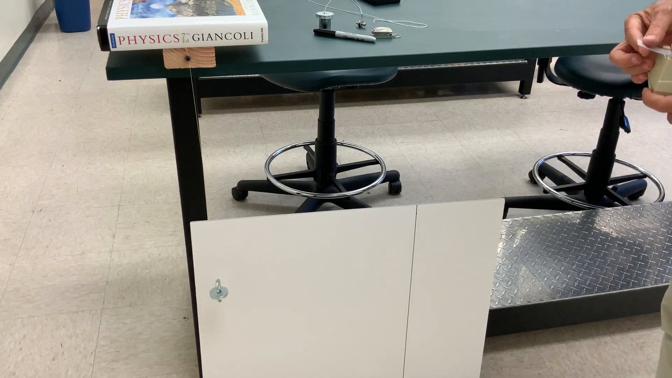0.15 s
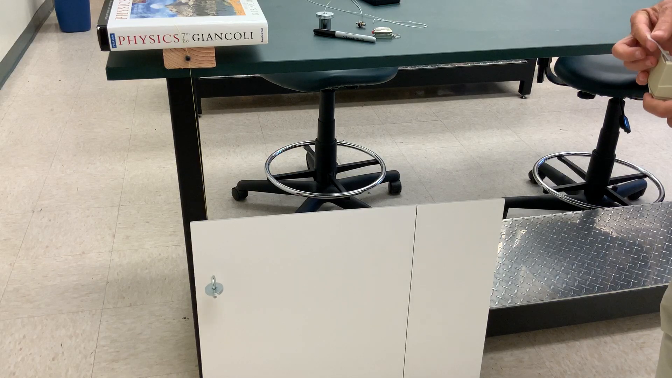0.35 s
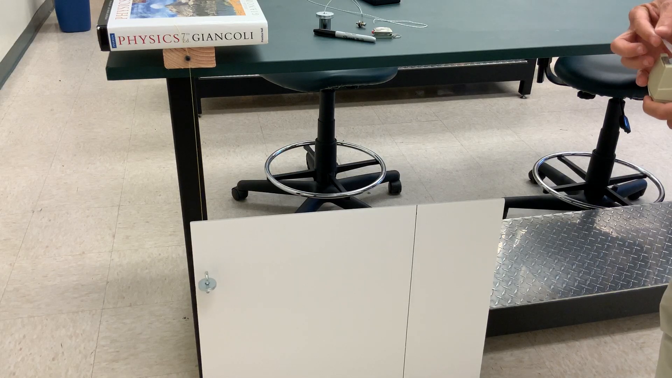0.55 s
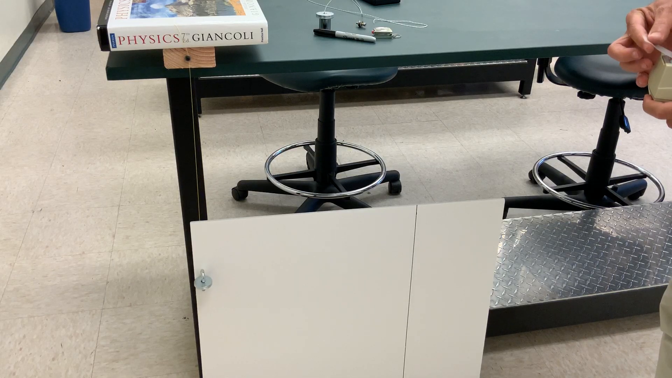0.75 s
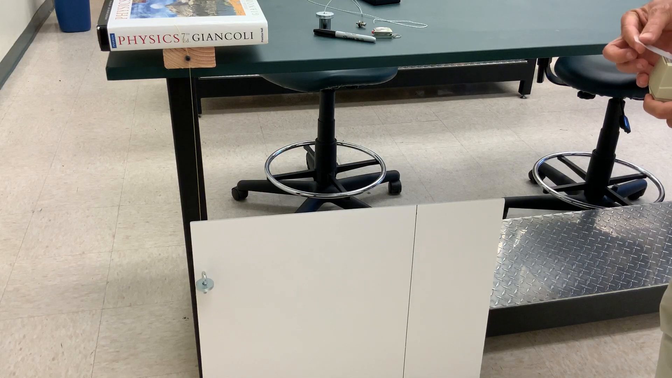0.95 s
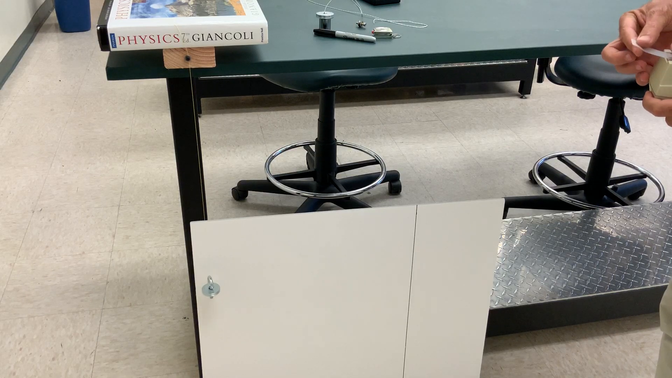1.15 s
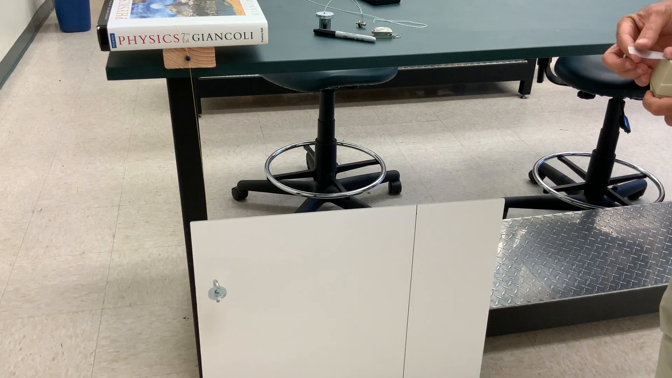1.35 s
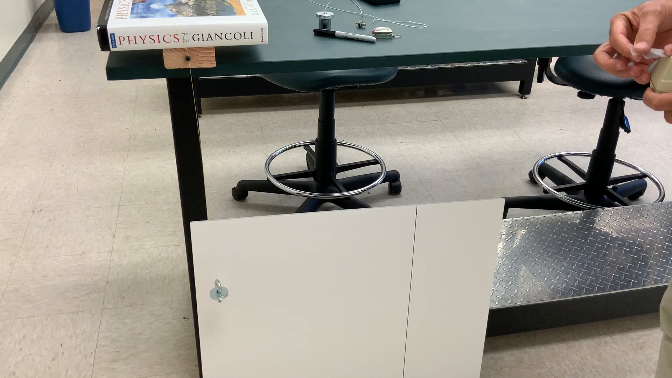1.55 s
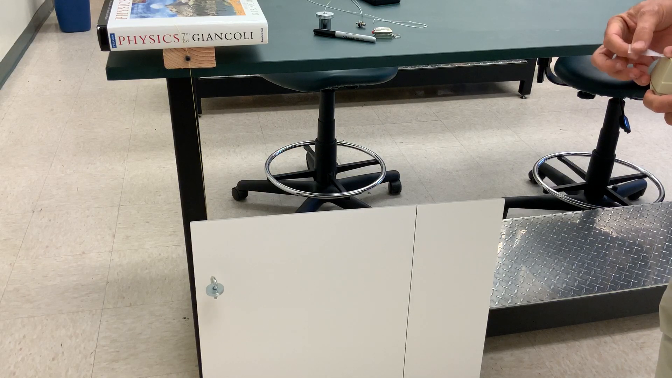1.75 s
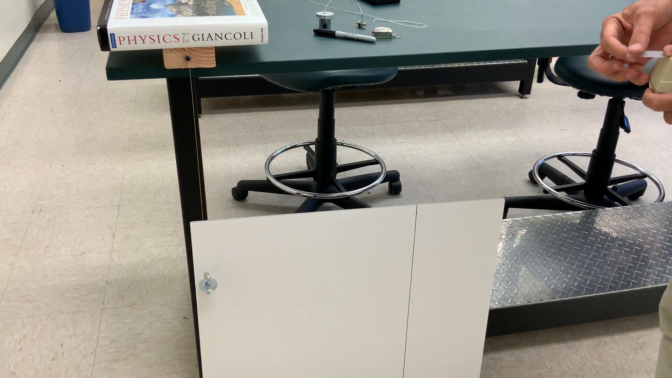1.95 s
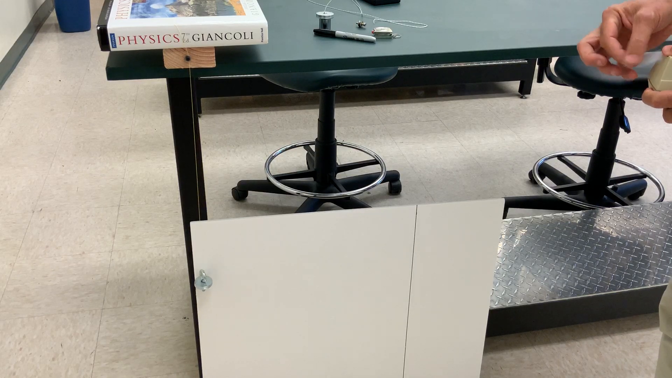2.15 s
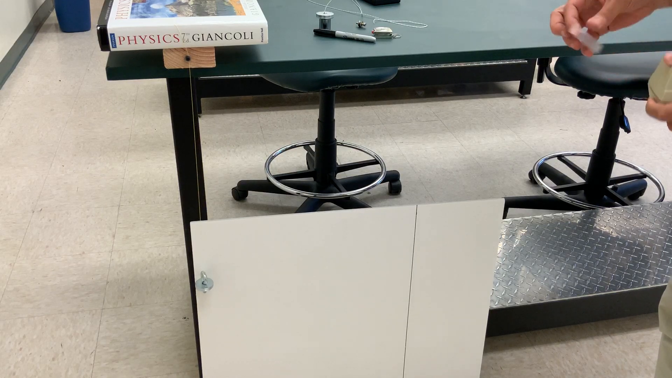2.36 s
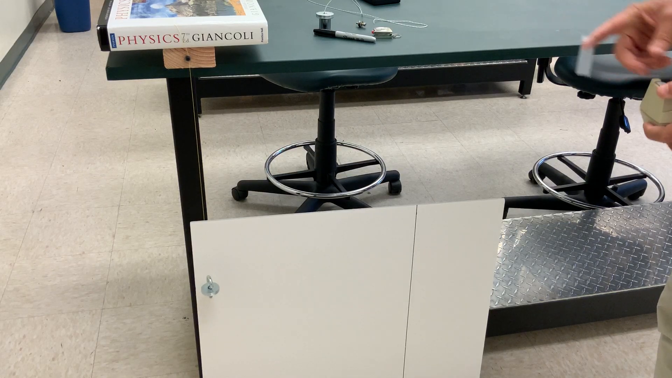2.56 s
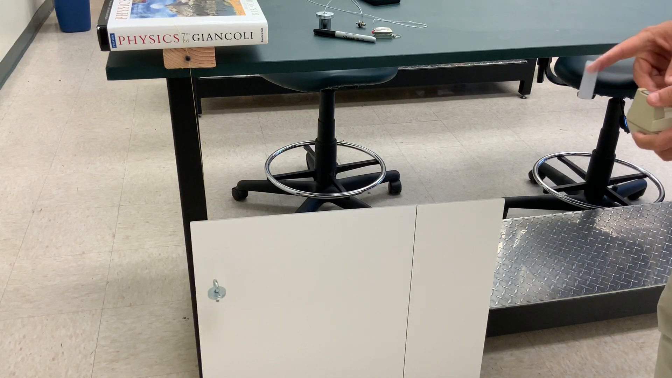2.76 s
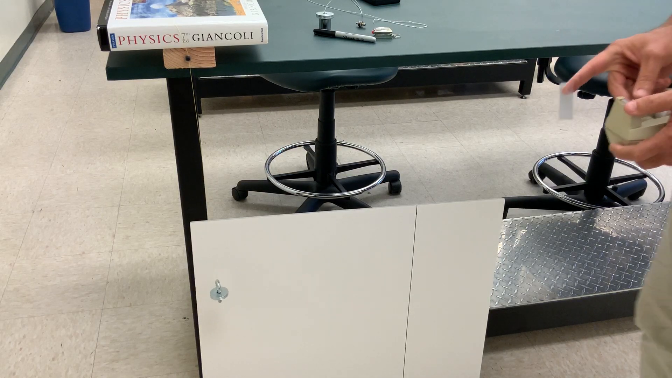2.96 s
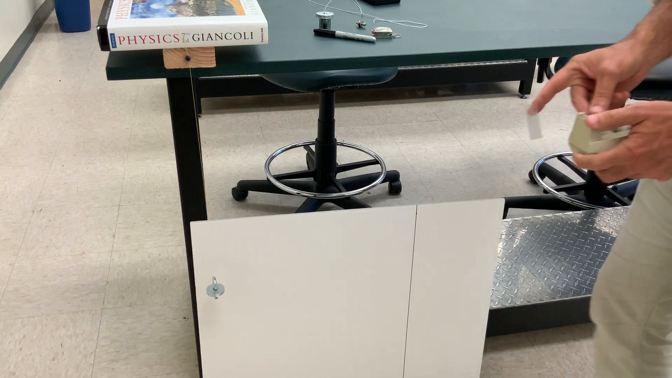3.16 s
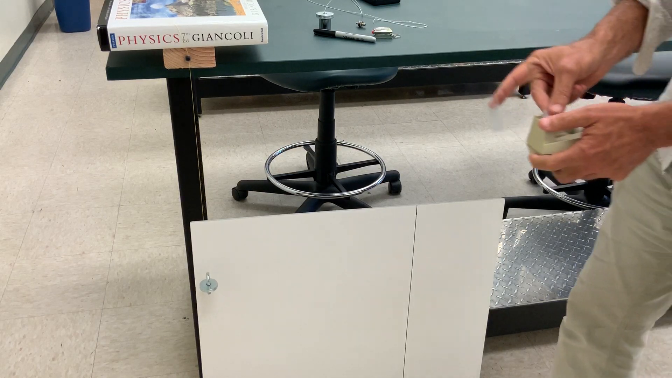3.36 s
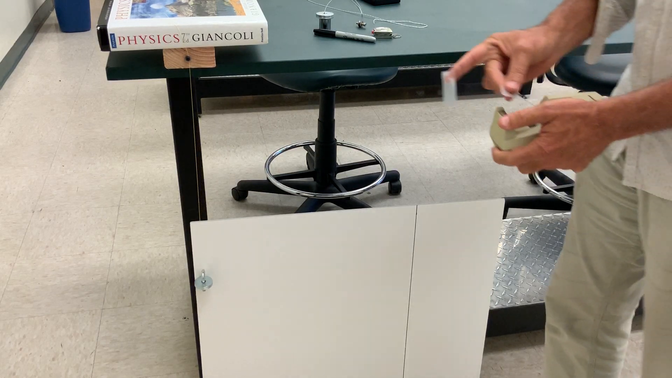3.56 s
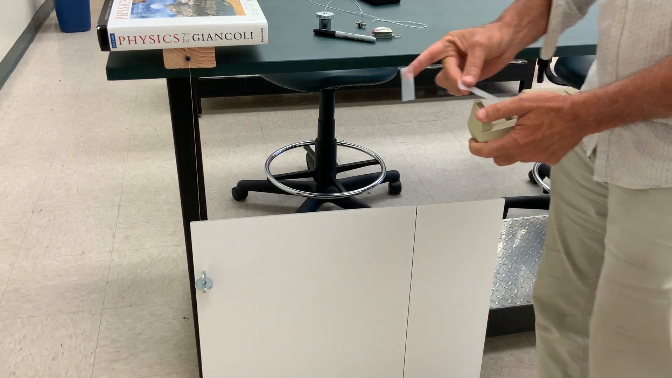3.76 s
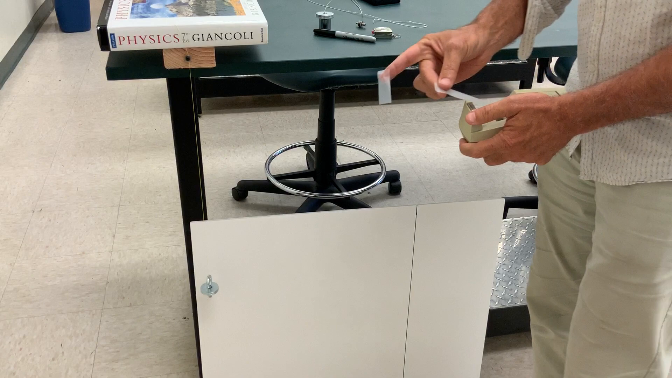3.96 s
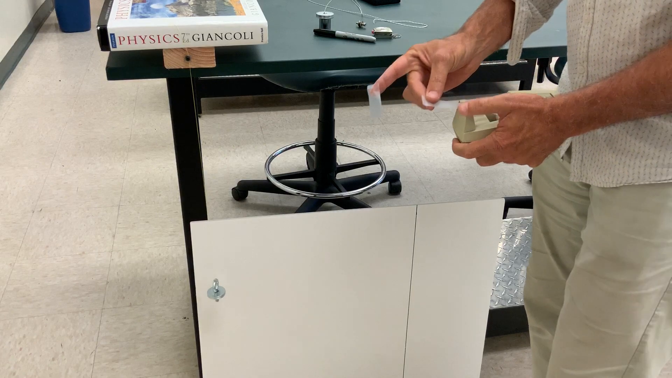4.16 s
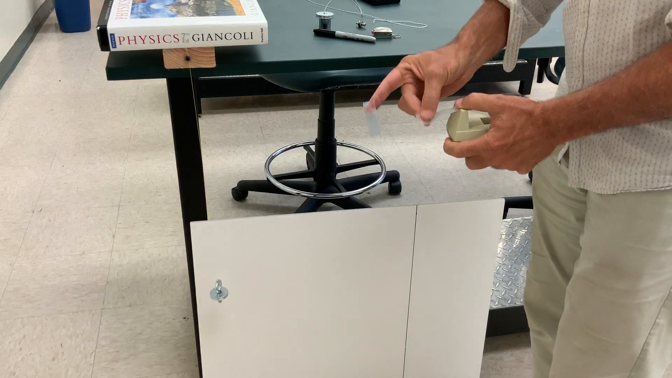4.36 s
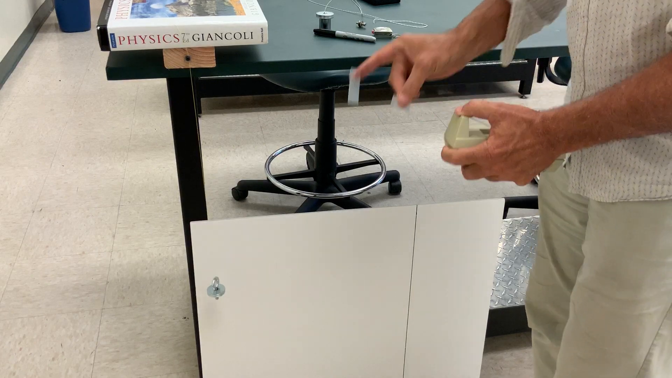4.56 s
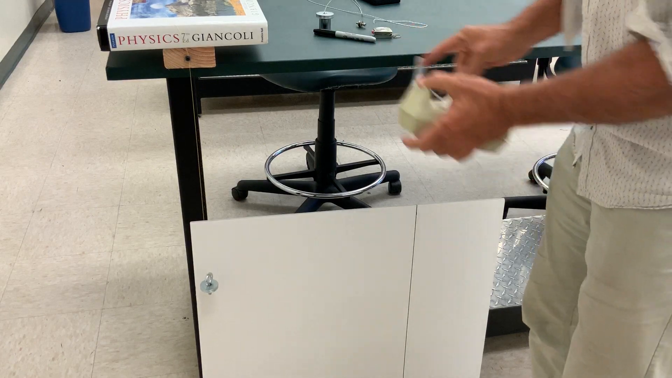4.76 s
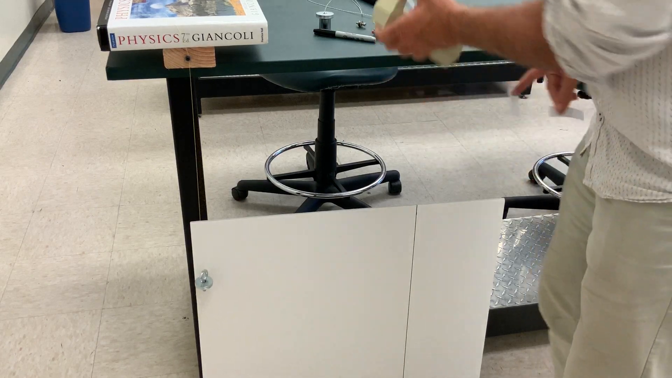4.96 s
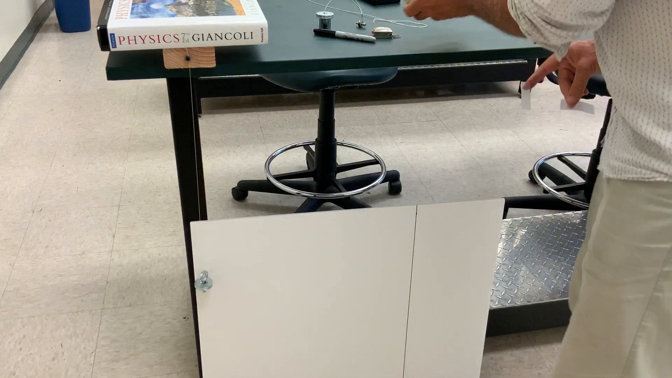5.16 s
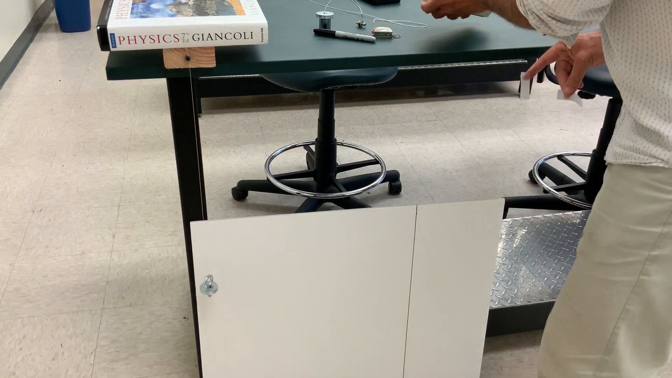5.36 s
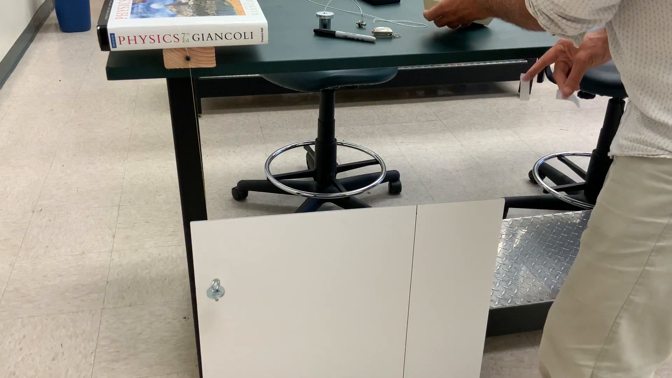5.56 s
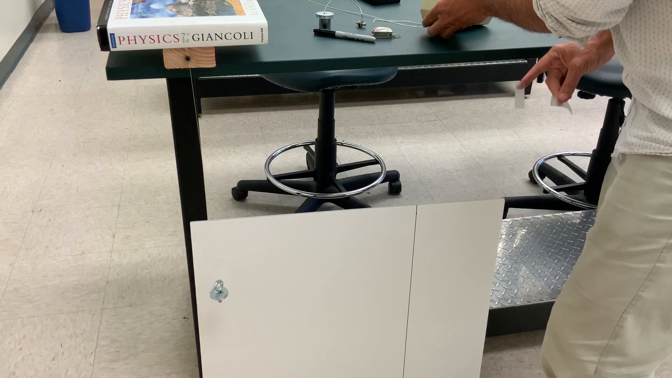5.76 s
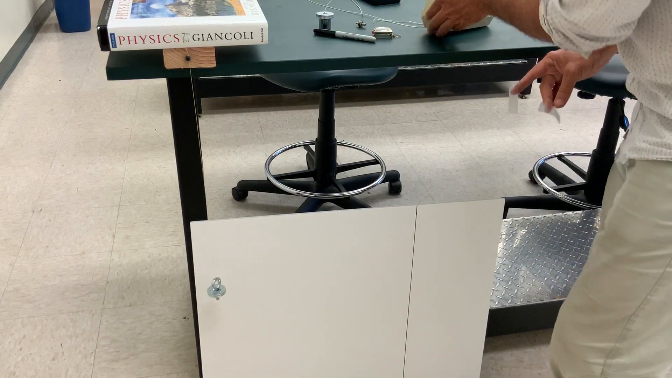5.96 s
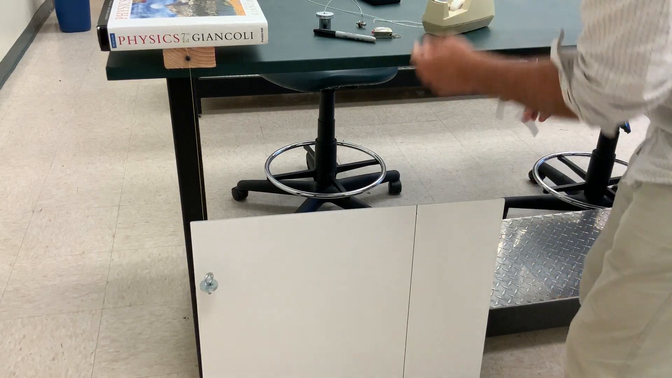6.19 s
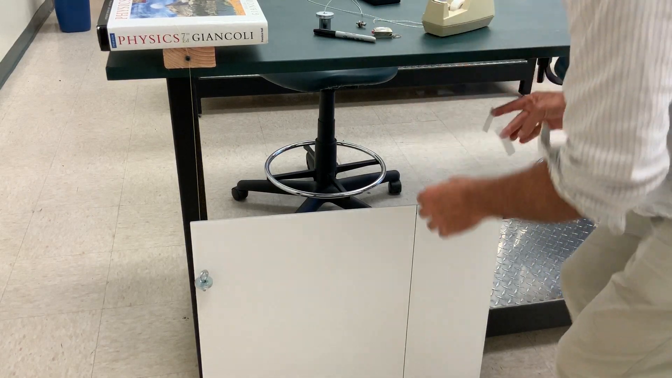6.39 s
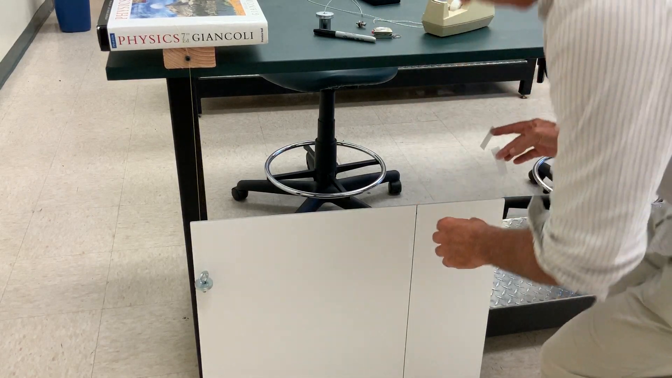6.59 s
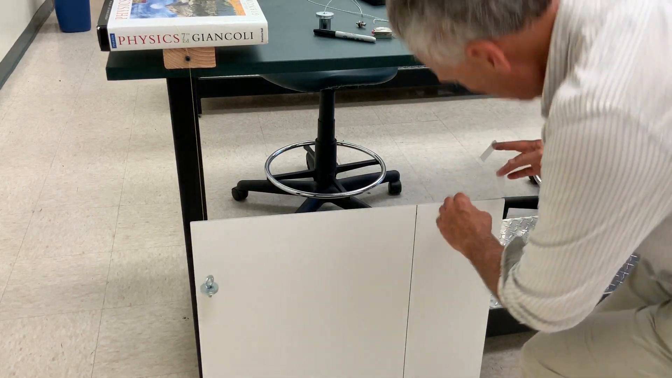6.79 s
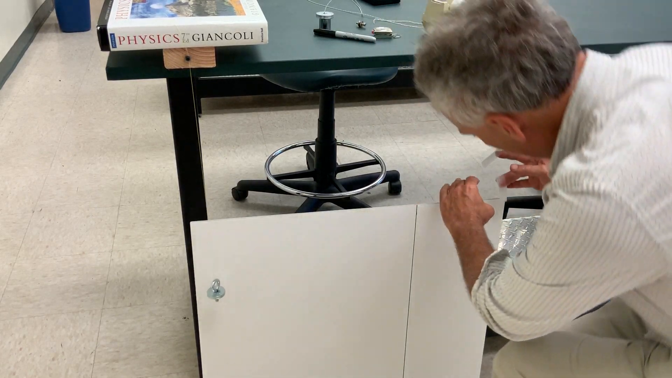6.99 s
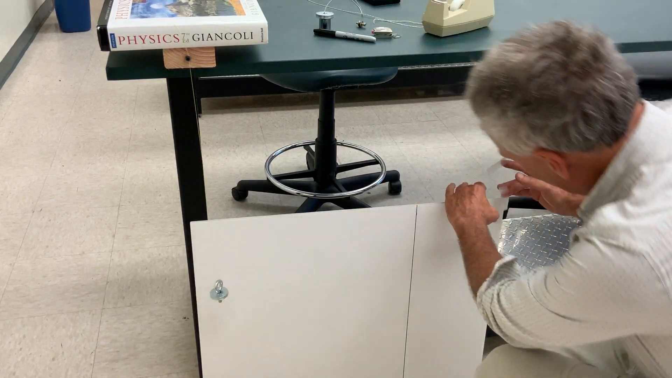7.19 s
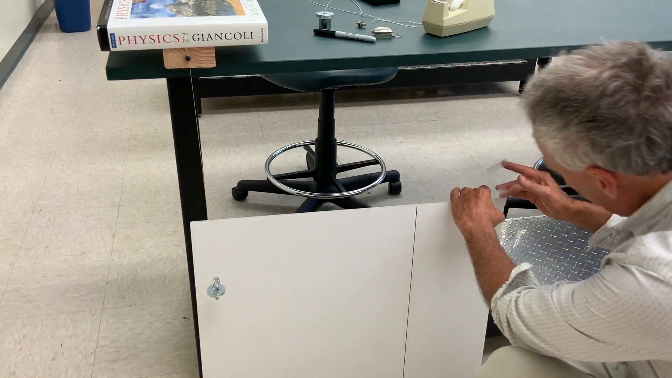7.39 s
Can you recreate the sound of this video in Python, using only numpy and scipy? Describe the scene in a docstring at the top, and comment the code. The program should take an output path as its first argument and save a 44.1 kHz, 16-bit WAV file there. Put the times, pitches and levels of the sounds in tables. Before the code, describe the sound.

A faint, low ventilation rumble runs throughout in a classroom with a short echo. The action is close and slightly to the right. At about 0.5 seconds, clear tape tears off a handheld dispenser with a sharp, bright snap. Thin, faint fingernail picks follow between 0.9 and 1.9 seconds, then a short crackling rip at 2.2. Around 3.4 seconds come a plastic click and a quick cluster of rips, with a slight hum from the strip. Another sharp tear lands at 4.4 seconds. Clothes rustle softly on and off from about 3 seconds, and light taps, clicks and tiny finger squeaks gather around 5. At 5.6 seconds the heavy dispenser knocks onto a table with a juddering thud and a brief ring, followed by two dull shoves near 6.1. Cloth keeps swishing until about 7.4 seconds, with a soft, deep rumble as the person crouches and two faint final clicks.

```python
"""Sticky tape in a classroom

Clear tape is picked at, peeled and torn off a hand-held dispenser: the film crackles in tiny slips,
snaps and shivers, and the free strip hums. Plastic clicks, hands tap and fingers squeak. The heavy
dispenser is then knocked down on a table and shoved into place, so the table thuds and rings.
Clothes rustle as the person moves and crouches; ventilation rumbles far below."""
import sys
import numpy as np
from scipy import signal
from scipy.fft import rfft, irfft, next_fast_len
from scipy.io import wavfile

SR = 44100
rng = np.random.default_rng(int(sys.argv[2]) if len(sys.argv) > 2 else 0)


def put_to_file(sound):
    """Save the sound as 16-bit audio at rate SR, in the file named by the first command-line argument."""
    columns = np.atleast_2d(sound).T  # one column per channel
    safe = np.clip(columns, -1, 1)
    whole_steps = np.round(safe * 32767)
    wavfile.write(sys.argv[1], SR, whole_steps.astype(np.int16))


N = 327698
TIME = np.arange(N) / SR
CUTOFF_HZ = 16300   # the top of the treble


def from_db(db):
    """Turn decibels into a gain."""
    return 10 ** (np.asarray(db) / 20)


def unit_power(x):
    """Scale a signal to an average power of one."""
    return x / np.sqrt(np.mean(x ** 2) + 1e-20)


def in_time(rows):
    """Join rows that begin with a time into one smooth curve for each other column."""
    times, *columns = np.transpose(rows)
    return [np.interp(TIME, times, column) for column in columns]


def at_hz(points, hz):
    """Read between the points of a curve, with frequency spaced in octaves."""
    known_hz, values = np.transpose(points)
    return np.interp(np.log(np.maximum(hz, 1)), np.log(known_hz), values)


def add(out, start_s, sound):
    """Mix a sound in at its start time."""
    i = int(round(start_s * SR))
    out[i:i + len(sound)] += sound[:N - i]


def response(db_at, size=1024):
    """How a body with the spectrum db_at(hz) answers one sharp tap; unit energy below the cut-off."""
    hz = np.maximum(np.fft.rfftfreq(size, 1 / SR), 20)
    cepstrum = irfft(np.log(from_db(db_at(hz))))
    cepstrum[1:size // 2] *= 2   # minimum phase: nothing sounds before the tap
    cepstrum[size // 2 + 1:] = 0
    spectrum = np.exp(rfft(cepstrum))
    energy = np.mean(abs(spectrum) ** 2 * (hz < CUTOFF_HZ))
    return irfft(spectrum / np.sqrt(energy))


def shaped(noise, spectrum):
    """Give a long noise a tone colour, at unit power."""
    size = next_fast_len(N)
    gain = from_db(at_hz(spectrum, np.fft.rfftfreq(size, 1 / SR)))
    return unit_power(irfft(rfft(noise, size) * gain, size)[..., :N])


def flutter(per_s, depth_db, size=N):
    """A random gain of unit power that changes per_s times a second."""
    knots = rng.standard_normal(size // 8 + 2)
    wander = np.interp(np.arange(size) * per_s / SR, np.arange(len(knots)), knots)
    return unit_power(from_db(depth_db * wander))


def from_right(x, lag_samples=27):
    """Sound from the right reaches the left microphone later."""
    return np.array([np.pad(x, (lag_samples, 0))[:N], x])


# Sound that comes from all around. Each row: frequency in Hz, how alike left and right are (0 to 1).
STEREO_LIKENESS = [(30, .93), (130, 0.84), (300, .75), (600, 0), (1200, 0.22), (16000, 0)]
def diffuse(size):
    """Stereo white noise from all around: long bass waves reach both sides alike."""
    padded = next_fast_len(size)
    alike = at_hz(STEREO_LIKENESS, np.fft.rfftfreq(padded, 1 / SR))
    mid, side = rfft(rng.standard_normal((2, padded)))
    left_right = np.sqrt(1 + alike) * mid + np.sqrt(1 - alike) * side * [[1], [-1]]
    return irfft(left_right, padded)[:, :size] / np.sqrt(2)


# The tone of the ventilation. Each row: frequency in Hz, relative level in dB.
VENT_SPECTRUM = [(25, 4.5), (40, -14), (58, 1), (80, -14), (135, -10.5), (190, -23.5), (228, -13.5),
                 (270, -26), (500, -33.5), (1100, -37.5), (2500, -52), (6500, -44), (10000, -50),
                 (15500, -49)]
def ventilation(level_db=-63):
    """Ventilation fills the room with a steady low rumble."""
    return from_db(level_db) * shaped(diffuse(N), [(8, -25.5)] + VENT_SPECTRUM)


def rubbing(db, spectrum, direct):
    """Fibres catch and slip: a grainy close sound mixed with a smooth one from all around."""
    grains = from_right(rng.standard_normal(N) * flutter(per_s=500, depth_db=4.2))
    return from_db(db) * flutter(per_s=45, depth_db=1.6) * shaped(direct * grains + diffuse(N), spectrum)


# The tones of swishing cloth and of its fine hiss. Each row: frequency in Hz, relative level in dB.
SWISH_SPECTRUM = [(200, -17), (500, -6), (900, -5), (1400, -5), (2000, 1), (3200, -1.5), (5000, -3),
                  (8000, -14), (14000, -22.5)]
HISS_SPECTRUM = [(400, -6.5), (1500, -31.5), (4000, -6), (7000, -3), (10000, 3.5), (14000, 4.5),
                 (15800, -5)]
# Arm and body movements. Each row: start and length in seconds, relative swish and hiss levels in dB.
MOVEMENTS = [(-0.04, 0.04, -66.5, -70), (0.832, 0.046, -81.5, -74), (0.12, 0.03, -72.5, -89),
             (2.912, 0.59, -77, -75), (3.31, 0.05, -60, -59), (3.27, 0.47, -69, -63.5),
             (3.723, 0.092, -64.5, -68), (3.848, 0.093, -79, -67.5), (4.035, 0.12, -58.5, -69.5),
             (4.759, 0.28, -68, -65), (4.956, 0.11, -61.5, -64.5), (5.066, 0.05, -60.5, -92),
             (5.331, 0.094, -80, -73.5), (5.86, 0.28, -78, -75.5), (6.05, 0.15, -54, -61),
             (6.305, 0.069, -58.5, -58.5), (6.372, 0.13, -61.5, -61), (6.555, 0.17, -65, -92),
             (6.538, 0.87, -69.5, -67), (7.303, 0.063, -62.5, -85)]
def clothes(attack_s=0.057, release_s=0.05, rest_swish_db=-88, rest_hiss_db=-87):
    """Cloth rubs faintly at rest; with each movement the rustle builds, holds and dies away."""
    power = from_db([[rest_swish_db], [rest_hiss_db]]) ** 2
    for start, length, swish_db, hiss_db in MOVEMENTS:
        rise = np.clip((TIME - start) / attack_s, 0, 1)
        fall = np.exp(-np.clip(TIME - start - length, 0, 1) / release_s)
        power = power + (from_db([[swish_db], [hiss_db]]) * rise * fall) ** 2
    swish_db, hiss_db = 10 * np.log10(power)
    swish = rubbing(swish_db - 1, SWISH_SPECTRUM, direct=0.093)
    hiss = rubbing(hiss_db + 2, HISS_SPECTRUM, direct=0.83)
    return swish + hiss


def touches(rows, width_octaves, decay_s, gain_db=2):
    """Each touch is a dying burst of noise in one resonance; a narrow one sounds pitched."""
    out, t = np.zeros(N), TIME[:8192]
    for start, db, centre_hz in rows:
        body = response(lambda hz: -20 * np.log10(1 + (np.log2(hz / centre_hz) / width_octaves) ** 2))
        burst = rng.standard_normal(len(t)) * np.exp(-t / decay_s)
        add(out, start, from_db(db + gain_db) * signal.fftconvolve(burst, body))
    return out


# Plastic clicks. Each row: start in seconds, relative level in dB, centre frequency in Hz.
PLASTIC_CLICKS = [(0.143, -59.5, 3380), (1.7226, -50.5, 3780), (3.3497, -40, 2070), (4.917, -54, 3000),
                  (5.042, -45.5, 4970), (5.5576, -42, 13000), (7.2085, -53.5, 5500), (7.316, -53, 3500)]
def clicks():
    """Hard plastic gives very short, broad clicks."""
    return touches(PLASTIC_CLICKS, width_octaves=2, decay_s=0.0024)


# The tone of the tape film. Each row: frequency in Hz, relative level in dB.
FILM_SPECTRUM = [(150, -31.5), (400, -35.5), (800, -22.5), (1600, -20), (2800, -18), (4500, -11.5),
                 (7000, -5), (10000, -3), (13000, 1.5), (15500, 1)]
def film(tilt_db, low_cut_hz):
    """How the film answers a tap: tauter tape is brighter, a shorter strip gives off less bass."""
    def db_at(hz):
        tilt = tilt_db * np.log2(np.maximum(hz, 700))
        edge_loss = (1 + (low_cut_hz / hz) ** 4) * (1 + (hz / CUTOFF_HZ) ** 40)
        return at_hz(FILM_SPECTRUM, hz) + tilt - 10 * np.log10(edge_loss)
    return response(db_at)


def slips(length_s, change_db, slips_per_s=1200, rough_db=4):
    """A run of tiny uneven slips that starts near unit power and swells or fades by change_db."""
    grains = rng.standard_normal(4096) * flutter(slips_per_s, rough_db, size=4096)
    run = grains[:int(length_s * SR)]
    return unit_power(run) * from_db(change_db * np.linspace(0, 1, len(run)))


# Rips tear tape on the blade or jerk it off the roll; picks are a fingernail at its end.
# Each row: moment it gives and length of the pull in seconds, crackle level in dB, treble tilt in dB
# per octave, then levels of the first snap, last snap and shiver in dB. All levels are relative.
TAPE_RIPS = [(0.48, 0.015, -39.5, -2.5, -26, -18, -31), (2.2181, 0.013, -31.5, -2, -34, -29, -44.5),
             (3.3495, 0.025, -56, 0.5, -59, -34.5, -43.5), (3.415, 0.037, -41, 3, -30.5, -26, -46),
             (3.4417, 0.022, -46.5, -1, -30, -22, -65), (4.4499, 0.022, -34.5, -1, -40, -14.5, -54)]
NAIL_PICKS = [(0.914, 0.026, -70.5, 3, -67, -68, -78), (1.391, 0.035, -67, 27, -58.5, -57.5, -76),
              (1.599, 0.038, -69, 10.5, -59, -60, -57), (1.6374, 0.01, -57, 6.5, -57, -46.5, -58.5),
              (1.7234, 0.027, -59.5, 3.5, -45, -39, -54), (1.8987, 0.03, -72.5, 20, -70, -57, -79)]
def tape_strokes():
    """Every rip and pick, with its low cut in Hz and the tilt of its snaps in dB per octave."""
    rips = [(*row, 330, 3) for row in TAPE_RIPS]   # a long strip sounds full
    picks = [(*row, 4800, 7.5) for row in NAIL_PICKS]   # a short stub sounds thin
    return rips + picks


def tape_crackle(swell_db=25.5, shiver_s=0.053, shiver_fall_db=39.5, gain_db=2):
    """The crackle grows with the pull until the film gives; the freed film shivers, a little duller."""
    out = np.zeros(N)
    for gives_at, pull_s, crackle_db, tilt_db, _, _, shiver_db, low_cut_hz, _ in tape_strokes():
        crackle = signal.fftconvolve(unit_power(slips(pull_s, swell_db)), film(tilt_db, low_cut_hz))
        shiver = signal.fftconvolve(slips(shiver_s, -shiver_fall_db), film(tilt_db - 1, low_cut_hz))
        add(out, gives_at - pull_s, from_db(crackle_db) * crackle)
        add(out, gives_at, from_db(shiver_db) * shiver)
    return from_db(gain_db) * out


def snap_times(catches=2, catch_boost_db=0.5):
    """Tape snaps as a stroke first bites and as it lets go, and catches at random in between."""
    for gives_at, pull_s, crackle_db, _, first_db, last_db, _, _, tilt_db in tape_strokes():
        yield gives_at - pull_s, first_db, tilt_db
        yield gives_at, last_db, tilt_db
        for share in rng.uniform(0, 0.6, size=catches):
            yield gives_at - share * pull_s, crackle_db + catch_boost_db, tilt_db


def tape_snaps(decay_s=0.001, shiver_gain=0.37, low_cut_hz=700):
    """Each snap is one sharp pulse, after which the film shivers for about a millisecond."""
    out, t = np.zeros(N), TIME[:256]
    for start, db, tilt_db in snap_times():
        shiver = shiver_gain * rng.standard_normal(len(t)) * np.exp(-t / decay_s) * (t > 0)
        snap = signal.fftconvolve(signal.unit_impulse(len(t)) + shiver, film(tilt_db, low_cut_hz))
        snap *= np.sqrt(SR / 1000) / np.linalg.norm(snap)   # the energy of a millisecond at unit power
        add(out, start, from_db(db) * snap)
    return out


# Dull taps. Each row: start in seconds, relative level in dB, centre frequency in Hz.
DULL_TAPS = [(3.262, -65, 2070), (4.365, -58.5, 590), (4.395, -61.5, 750), (4.442, -48.5, 990),
             (5.121, -54.5, 2160), (6.074, -46.5, 1360), (6.645, -51, 573)]
def taps():
    """Hands, shoes and things being handled give short, dull taps."""
    return touches(DULL_TAPS, width_octaves=0.79, decay_s=0.01)


# The hum of tape drawn off the roll. Each row: time in seconds, pitch in Hz, relative level in dB.
STRIP_HUM = [(3.34, 1197, -71), (3.43, 1126, -65), (3.52, 1166, -76), (3.97, 1440, -81),
             (4.03, 1450, -85.5)]
def peel(width_hz=240, gain_db=-4):
    """Glue letting go shakes the free strip, whose resonance rises with the pull."""
    hz, db = in_time(STRIP_HUM)
    pulling = (TIME > STRIP_HUM[0][0]) & (TIME < STRIP_HUM[-1][0])
    low_pass = signal.butter(2, width_hz / 2, fs=SR, output="sos")
    shake = signal.sosfilt(low_pass, rng.standard_normal((2, N)))
    phase = 2 * np.pi * np.cumsum(hz) / SR
    hum = shake[0] * np.cos(phase) - shake[1] * np.sin(phase)   # a band of noise around the pitch
    return pulling * from_db(db + gain_db) * unit_power(hum)


# Finger squeaks. Each row: start in seconds, relative level in dB, pitch in Hz.
FINGER_SQUEAKS = [(4.150, -65, 1670), (4.798, -64.5, 2680), (4.879, -61, 2100), (4.961, -57.5, 2180),
                  (5.042, -55, 1910)]
def squeaks():
    """Fingers on the plastic shell give brief, pitched squeaks."""
    return touches(FINGER_SQUEAKS, width_octaves=0.14, decay_s=0.014)


def softened(x, contact_hz):
    """A soft contact passes on only the lows."""
    return signal.sosfilt(signal.butter(4, contact_hz, fs=SR, output="sos"), x)


# The dispenser is set down, then shoved twice. Each row: start in seconds, relative level in dB,
# treble cut-off in Hz, first gap of its judder in seconds, loss per contact in dB.
DISPENSER_KNOCKS = [(5.5596, -1.5, 4600, 0.010, 2.45), (6.070, -2.5, 227, 0.018, 3),
                    (6.147, -9.5, 208, 0.01, 13)]
# The table's clear notes. Each row: pitch in Hz, relative level in dB, seconds to fade by 60 dB.
TABLE_NOTES = [(56.6, -6, 0.45), (131.3, 2, 0.31), (153, -3, 0.22), (207.4, -3.5, 0.69),
               (238.4, -3.5, 0.74), (292.3, 1.5, 0.21), (359, 1, 0.39), (407.8, 7.5, 0.24), (506, -13, 0.2),
               (583, 2, 0.8), (640, 1, 0.6), (914, -17, 0.59), (1073, -3.5, 0.72), (1195, -1.5, 0.6),
               (1320, -19, 0.29), (2170, -11, 0.14), (2190, -13, 0.076)]
def table_ring(gain_db=-40, build_s=0.01):
    """Each knock sets the table ringing; the blow takes a moment to spread over its top."""
    force, t = np.zeros(N), TIME[:SR]
    for start, db, contact_hz, _, _ in DISPENSER_KNOCKS:
        add(force, start, from_db(db) * softened(signal.unit_impulse(2048), contact_hz))
    notes = sum((-1) ** k * from_db(db - 60 * t / fade_s) * np.sin(2 * np.pi * hz * t)
                for k, (hz, db, fade_s) in enumerate(TABLE_NOTES))
    build = 1 - np.exp(-t / build_s)
    return from_db(gain_db) * signal.fftconvolve(force, notes * build)[:N]


def judder(contacts=5, gap_growth=1.2, softening=0.81):
    """After each knock the dispenser judders to rest in weaker, softer, wider-spaced contacts."""
    for start, db, contact_hz, gap_s, loss_db in DISPENSER_KNOCKS:
        for k in range(contacts):
            yield start, db - k * loss_db, contact_hz * softening ** k
            start += gap_s * gap_growth ** k


# The tone of the table's thud. Each row: frequency in Hz, relative level in dB.
THUD_SPECTRUM = [(25, -14), (50, -14), (120, -18.5), (200, -11.5), (300, -7), (400, -10), (600, -6),
                 (780, -18.5), (1150, -12), (1700, -22), (3200, -29.5), (5500, -26.5), (9000, -15.5),
                 (15000, -59)]
def table_thud(gain_db=-12, decay_s=0.0071):
    """Every contact stirs a crowd of short-lived table vibrations that blur into a thud."""
    out, t = np.zeros(N), TIME[:4096]
    body = response(lambda hz: at_hz(THUD_SPECTRUM, hz), size=len(t))
    for start, db, contact_hz in judder():
        burst = signal.fftconvolve(rng.standard_normal(len(t)) * np.exp(-t / decay_s), body)
        add(out, start, from_db(db + gain_db) * softened(burst / np.linalg.norm(burst), contact_hz))
    return out


# The swell of the crouching rumble. Each row: time in seconds, level in dB.
RUMBLE_LEVELS = [(6.55, -91), (6.68, -53.5), (6.92, -53), (7.1, -91)]
# Its tone. Each row: frequency in Hz, relative level in dB.
RUMBLE_SPECTRUM = [(18, -7), (27, -1), (50, -6.5), (80, -22.5), (140, -28.5), (300, -33), (1000, -99)]
def crouch():
    """A deep rumble swells and fades as the person crouches."""
    return from_db(in_time(RUMBLE_LEVELS)[0]) * shaped(diffuse(N), RUMBLE_SPECTRUM)


# How long the room echoes. Each row: frequency in Hz, seconds to fade by 60 dB.
ECHO_TIMES = [(100, 0.94), (400, 0.59), (1000, 0.54), (2500, 0.45), (6000, 0.52), (10000, 0.45),
              (15000, 0.43)]
# How strongly it echoes. Each row: frequency in Hz, gain of the echo in that band in dB.
ECHO_LEVELS = [(100, 7.5), (500, 7.5), (1200, 5.5), (3000, 6), (6500, 0), (10000, -0.5), (15000, -12.5)]
def classroom(x, first_echo_s=0.00046, build_s=0.0013, early_db=4, early_s=0.06):
    """Reflections off table and floor thicken into a tail that dies band by band."""
    t = TIME[:int(0.8 * SR)]
    hz = np.fft.rfftfreq(len(t), 1 / SR)
    noise, tail = rfft(diffuse(len(t))), 0
    centres = np.geomspace(100, 16000, 12)
    build = 1 - np.exp(-np.maximum(t - first_echo_s, 0) / build_s)
    early_boost = from_db(early_db * np.exp(-t / early_s))
    for centre, share in zip(centres, np.eye(len(centres))):
        band = irfft(noise * at_hz(np.c_[centres, share], hz), len(t))
        fade = build * early_boost * from_db(-60 * t / at_hz(ECHO_TIMES, centre))
        tail = tail + band * fade / np.linalg.norm(fade) * from_db(at_hz(ECHO_LEVELS, centre))
    return signal.fftconvolve(x[None], tail, axes=1)[:, :N]


def tape_echoes(walls=3, snap_db=-18):
    """The wrinkled film sends a different crackle to each wall; its sharp snaps stir the room less."""
    echoes = sum(classroom(tape_crackle() + from_db(snap_db) * tape_snaps()) for _ in range(walls))
    return echoes / np.sqrt(walls)


def scene():
    """Tape, table and movement in the room, over the ventilation."""
    ring, thud = table_ring(), table_thud()
    strip = peel()
    handling = clicks() + taps() + squeaks()
    close = from_right(tape_crackle() + tape_snaps() + strip + handling)
    table = from_right(ring + thud, lag_samples=14)   # less lag, as the whole top gives off sound
    into_room = strip + from_db(-6) * handling + from_db(7.5) * thud + from_db(-17.5) * ring
    echoes = tape_echoes() + classroom(into_room)
    return close + table + echoes + clothes() + crouch() + ventilation()


def shared_treble(dry, above_hz=9300, crossover_hz=700, lag_samples=29):
    """The top treble on the left is mostly that of the right microphone, inverted and slightly later."""
    left, right = dry
    size = next_fast_len(N)
    hz = np.fft.rfftfreq(size, 1 / SR)
    share = np.clip(0.5 + (hz - above_hz) / crossover_hz, 0, 0.9)
    inverted = -from_right(right, lag_samples)[0]
    swap = irfft(rfft(inverted - left, size) * share, size)[:N]
    return np.array([left + swap, right])


def record(dry):
    """The two sides share their top treble, the right is a touch louder, and the very top is cut."""
    balance = from_db([[-0.3], [0.3]])
    low_pass = signal.ellip(10, 0.3, 80, CUTOFF_HZ, fs=SR, output="sos")
    return signal.sosfilt(low_pass, shared_treble(dry) * balance)


dry = scene()
out = record(dry)
put_to_file(out)
```